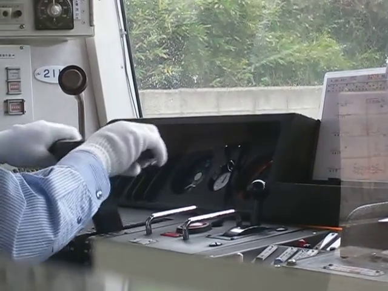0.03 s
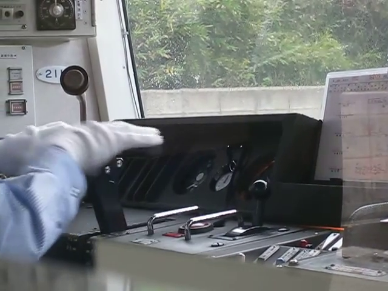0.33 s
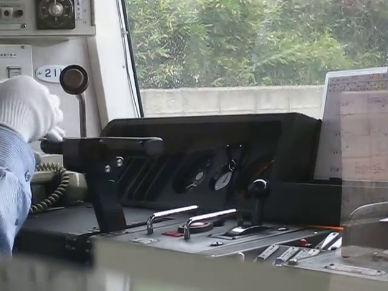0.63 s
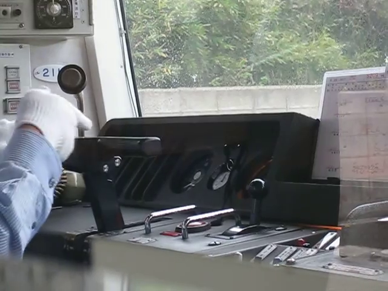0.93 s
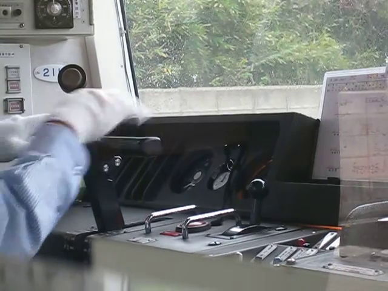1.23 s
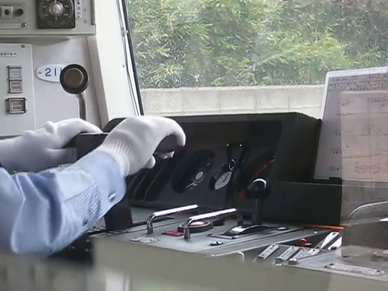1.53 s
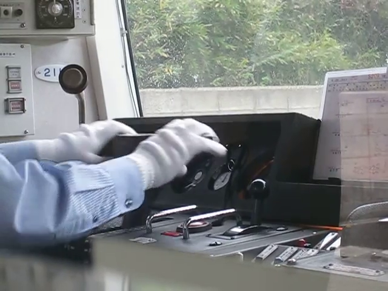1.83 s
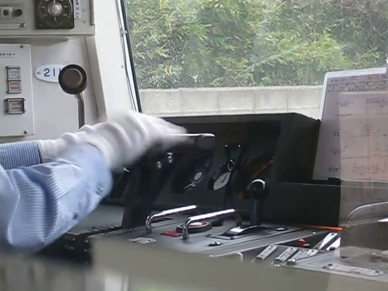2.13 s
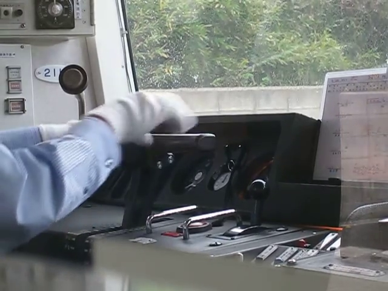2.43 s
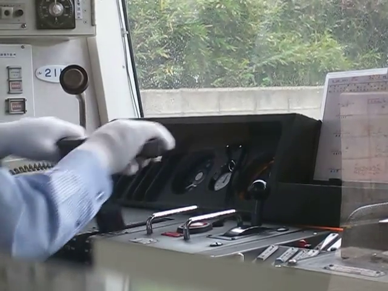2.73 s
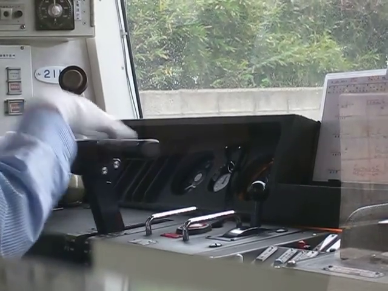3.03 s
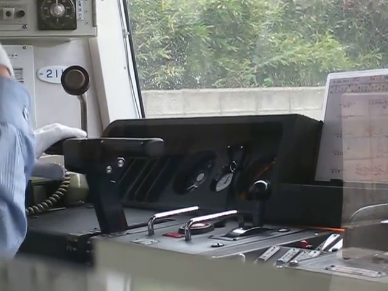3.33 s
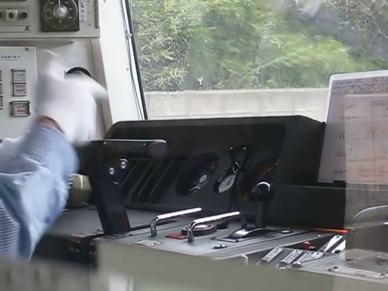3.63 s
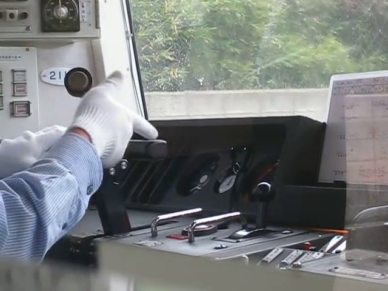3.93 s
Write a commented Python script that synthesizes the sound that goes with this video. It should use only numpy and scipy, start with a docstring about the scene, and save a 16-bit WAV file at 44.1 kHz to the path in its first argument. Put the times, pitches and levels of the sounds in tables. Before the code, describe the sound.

Compressed air hisses loudly twice from a train's brake valve inside the driver's cab.

```python
"""Inside a train driver's cab, one microphone, the walls close by. Over a low rumble, compressed air
vents from the brake valve with a puff and a long hiss. The jet rings the exhaust pipe's narrow resonances,
hoots briefly, and single bands swell as the flow shifts. Near 1.5 s it ends in short, duller puffs.
The rumble shows in the gap, with a tick and a faint whistle. More puffs lead into a second hiss from
2.7 s to the end. Gain control ducks the rumble under both hisses."""
import sys
import numpy as np
from scipy import signal
from scipy.fft import rfft, irfft
from scipy.io import wavfile
from scipy.ndimage import uniform_filter1d

SR = 44100
rng = np.random.default_rng(int(sys.argv[2]) if len(sys.argv) > 2 else 0)


def log_audio(samples):
    """Write samples as a 16-bit WAV file to the path given in sys.argv[1]."""
    # one column per channel
    frames = np.atleast_2d(samples).T
    # limit to full scale, then quantise
    limited = np.clip(frames, -1, 1)
    pcm = np.round(limited * 32767).astype(np.int16)
    wavfile.write(sys.argv[1], SR, pcm)


N = 176400
TIME, FREQ = np.arange(N) / SR, np.fft.rfftfreq(N, 1 / SR)

# spectrum of the cab's rumble: (frequency [Hz], relative level [dB])
RUMBLE_SPECTRUM = [(12, -34), (20, -9.5), (90, -14), (157, -13), (372, -4), (453, -11), (535, -1),
                   (650, -9), (883, -11), (1300, -16.5), (1800, -17.5), (2500, -24.5), (3760, -32),
                   (6210, -33), (7540, -40), (8200, -46), (9420, -33), (10500, -39.5), (11800, -32.5),
                   (15600, -49)]
# short puffs of air: (start [s], hold [s], level [dB], treble lift [dB])
PUFF_EVENTS = [(-.005, 0.042, -27.5, -20), (1.403, 0.089, -29, 0), (1.624, 0.014, -38, 2),
               (1.715, 0.06, -32.5, -5), (1.782, 0.03, -26, -12), (1.838, 0.033, -25, -4.5),
               (2.549, 0.027, -34, 7), (2.621, 0.046, -28.5, -8), (2.654, 0.097, -25.5, -3.5),
               (2.728, 0.016, -20.5, 1), (2.792, 0.093, -28, 1)]
# spectrum of a puff: (frequency [Hz], relative level [dB])
PUFF_SPECTRUM = [(15, -48), (25, -26), (129, -5.5), (169, -17), (282, -3), (400, -6), (496, -5),
                 (632, -1.5), (704, -10.5), (1110, -1.5), (1420, -8), (1880, -1.5), (2430, -12),
                 (3350, -8.5), (5300, -15), (6070, -12.5), (7130, -18.5), (7940, -28.5), (11000, -17.5),
                 (14000, -24), (15600, -38)]
# resonances of the exhaust pipe: (frequency [Hz], width [Hz], lift [dB])
PIPE_RESONANCES = [(325, 58, 9.5), (673, 69, 5), (982, 32, 13), (1041, 42, 10), (1105, 13.3, 16),
                   (1219, 114, 6), (1486.5, 47, 10), (1553, 75, 10), (1687.4, 81, 15.5), (1767.5, 40, 15.5),
                   (1889, 41, 13), (1992, 85, 4.5), (2154, 46, 9), (3000, 220, 5), (3872, 79, 12.5),
                   (4164, 134, 9), (4322, 52, 15.5), (6325, 92, 9), (6430, 17, 12.5), (6540, 75, 13),
                   (12470, 74, -3), (12540, 64, 1), (14390, 80, 5)]
# spectrum of the air jet: (frequency [Hz], relative level [dB])
JET_SPECTRUM = [(100, -20.5), (250, -23), (500, -8.5), (900, -2), (1700, -1), (2320, -0.5), (2440, -15),
                (3400, -10.5), (4400, -6), (4800, -12), (5600, -1.4), (6550, -11), (6750, -17), (7400, -15),
                (7900, -31.5), (8500, -13.5), (9500, -9), (12300, -1.5), (14500, -11), (15600, -20.2)]
# limits of the jet's four bands: (frequency [Hz])
JET_BAND_EDGES = [0, 900, 2450, 7900, 20000]
# relative band levels, one table per venting: (time [s], bass [dB], body [dB], upper mids [dB], treble [dB])
VENT_LEVELS = [
    [(0, -45, -32, -38, -37), (.028, -30, -42, -42, -40), (.038, -35.5, -24, -30.5, -21),
     (.13, -37.5, -24.5, -33, -27), (.45, -31.5, -19.5, -31, -28.5), (.73, -34.5, -24, -29.5, -27.5),
     (1.03, -33, -20.5, -30, -27.5), (1.28, -35, -26.5, -31, -27.5), (1.456, -36, -28.5, -34, -30),
     (1.52, -40, -32.5, -37, -32), (1.592, -67, -39, -46.5, -49.5), (1.7, -69, -55, -76, -69)],
    [(2.69, -62, -47, -55, -64), (2.728, -55, -42, -46, -41), (2.742, -35, -23, -30, -26.5),
     (2.775, -37, -27, -32, -26), (2.825, -43, -33, -41, -31), (2.868, -34, -17.5, -27.5, -26),
     (2.93, -41, -24, -27, -27.5), (3.09, -47, -26.5, -32, -27.5), (3.2, -39, -25, -31, -27),
     (3.7, -36, -22, -29.5, -29), (4.0, -32.5, -22.5, -30, -26.5)],
]
# narrow rushes of air:
# (middle [s], half length [s], frequency [Hz], glide [Hz/s], width [Hz], relative level [dB])
FLOW_SWELLS = [(0.2, 0.22, 3590, 153.5, 160, -33), (0.273, 0.45, 2700, 4, 330, -41),
               (0.195, 0.074, 1320, 0, 110, -27.5), (0.254, 0.38, 4950, -300, 430, -35),
               (0.302, 0.77, 7130, 447, 480, -41.5), (0.403, 0.14, 1275, -200, 90, -22.5),
               (0.557, 0.19, 1330, 502, 119, -27.5), (0.68, 0.71, 4000, 798.5, 520, -34.5),
               (1.1, 0.37, 4440, -8, 280, -36), (0.79, 0.084, 1472, 0, 50, -26),
               (0.87, 0.16, 687, 0, 49.6, -29), (1.109, 0.35, 1696, 551.5, 173, -25),
               (1.22, 0.42, 10060, 6, 90, -40), (1.27, 0.31, 10780, -3, 260, -40.5),
               (1.36, 0.075, 1686, 0, 50, -25.5), (2.378, 0.022, 5400, -9000, 170, -63),
               (2.758, 0.13, 157, 4, 150, -44.5), (2.853, 0.076, 982, 0, 50, -33.5),
               (2.938, .11, 12800, 0, 2300, -27), (3.06, 0.19, 5520, -700, 380, -29),
               (3.21, 0.21, 2157, 3, 29.6, -36), (3.288, 0.12, 5470, -700, 380, -30.5),
               (3.429, 0.28, 4000, 509, 400, -31), (3.45, 0.08, 1470, 0, 90, -25),
               (3.48, 0.21, 7170, 12, 400, -39), (3.696, 0.17, 682, 0, 80, -32),
               (3.762, 0.07, 1494, 0, 50, -22.5), (3.862, 0.15, 4360, 400, 250, -31.5),
               (3.919, 0.078, 385, 0, 69.5, -34.5), (3.92, 0.14, 1750, 150, 120, -22.5)]
# hoots of the jet: (start [s], length [s], pitch [Hz], level [dB])
HOOT_EVENTS = [(0.357, 0.025, 1262, -10.5), (0.394, 0.056, 1257, -17.5)]
# course of the thin whistle: (time [s], pitch [Hz], level [dB])
WHISTLE_PATH = [(1.9, 7370, -72), (2.15, 7500, -57), (2.3, 7500, -66), (2.55, 7350, -75)]


def amp(db):
    """Decibels to gain."""
    return 10 ** (np.asarray(db) / 20)


def unit(x):
    """Scales to rms 1."""
    return x / np.sqrt(np.mean(x ** 2) + 1e-20)


def spectrum(points):
    """A spectrum table as gain along the frequency axis."""
    hz, db = np.transpose(points)
    return amp(np.interp(np.log(FREQ + 1), np.log(hz + 1), db))


def bell(axis, middle, width):
    """A bump of height 1 with the given width at half height."""
    return .5 ** ((2 * (axis - middle) / width) ** 2)


def noise(gain):
    """Noise of rms 1 with the given spectrum."""
    return unit(irfft(rfft(rng.standard_normal(N)) * gain, N))


def wander(rate_hz):
    """Random drift of rms 1, mostly slower than the given rate."""
    return noise(bell(FREQ, 0, 2 * rate_hz))


def wall_colour(ripple_db=4.5, ripple_hz=18, from_hz=2700, to_hz=19000):
    """Reflections from the close walls comb the treble into fine peaks and dips."""
    size = int(ripple_hz * N / SR)
    comb = unit(uniform_filter1d(uniform_filter1d(rng.standard_normal(len(FREQ)), size), size))
    treble = FREQ ** 2 / (FREQ ** 2 + from_hz ** 2) / (1 + (FREQ / to_hz) ** 2)
    return amp(ripple_db * comb * treble)


def cab_rumble(walls, level_db=-38.5, unsteady_db=1.4):
    """Room tone of the cab: a low rumble whose level wavers slightly."""
    return amp(level_db + unsteady_db * wander(7.9)) * noise(walls * spectrum(RUMBLE_SPECTRUM))


def air_puffs(walls, rise_s=.0095, t60_s=.29, lift_hz=2500, low_cut_hz=56):
    """Broad bursts of air open fast, hold and die away in the cab."""
    low_cut = FREQ ** 4 / (FREQ ** 4 + low_cut_hz ** 4)
    treble = FREQ ** 2 / (FREQ ** 2 + lift_hz ** 2)
    shape = walls * spectrum(PUFF_SPECTRUM) * low_cut
    out = np.zeros(N)
    for start, hold, db, lift_db in PUFF_EVENTS:
        t = TIME - start
        envelope = np.clip(t / rise_s, 0, 1) * amp(db - 60 * np.maximum(t - hold, 0) / t60_s)
        out += envelope * noise(shape * amp(lift_db * treble))
    return out


def valve_hiss(walls, gain_db=4.5, flutter_db=.67, sputter_db=.25):
    """The brake valve's fluttering jet rings the exhaust pipe; four bands follow their own levels."""
    pipe = walls * amp(sum(db * bell(FREQ, hz, width) for hz, width, db in PIPE_RESONANCES))
    jet = pipe * spectrum(JET_SPECTRUM)
    bands = [noise(jet * (FREQ >= lo) * (FREQ < hi)) for lo, hi in zip(JET_BAND_EDGES, JET_BAND_EDGES[1:])]
    hiss = np.zeros(N)
    for vent in VENT_LEVELS:
        times, *levels = np.transpose(vent)
        is_open = (TIME > times[0] - .05) * (TIME < times[-1] + .05)
        for band, db in zip(bands, levels):
            hiss += band * amp(np.interp(TIME, times, db)) * is_open
    hiss += flow_swells(pipe)
    return hiss * amp(gain_db + flutter_db * wander(rate_hz=25) + sputter_db * wander(rate_hz=249))


def flow_swells(pipe):
    """As the flow shifts, narrow rushes of air swell, glide and fade, coloured by the pipe."""
    out = np.zeros(N)
    for middle, half_length, hz, glide, width, db in FLOW_SWELLS:
        t = TIME - middle
        envelope = np.cos(np.pi / 2 * np.clip(t / half_length, -1, 1))
        # complex noise, so that a turning phase slides the whole band
        eddies = np.fft.ifft(rfft(rng.standard_normal(N)) * np.sqrt(bell(FREQ, hz, width)), N)
        slide = np.exp(1j * np.pi * glide * t ** 2)
        rush = envelope * (eddies * slide).real
        piped = unit(irfft(rfft(rush) * np.sqrt(pipe), N))
        out += amp(db) * np.sqrt(np.mean(envelope ** 2)) * piped
    return out


def jet_hoots(edge_s=.006, waver_rad=.5, waver_hz=45):
    """For an instant the jet locks onto one unsteady note."""
    out = np.zeros(N)
    for start, length, hz, db in HOOT_EVENTS:
        t = TIME - start
        envelope = amp(db) * np.clip(np.minimum(t, length - t) / edge_s, 0, 1)
        out += envelope * unit(np.sin(2 * np.pi * hz * t + waver_rad * wander(waver_hz)))
    return out


def control_tick(start_s=2.071, hz=4100, width_hz=1200, level_db=-47, t60_s=.04):
    """A tiny, dry tick from the controls."""
    t = TIME - start_s
    envelope = (t > 0) * amp(level_db - 60 * np.maximum(t, 0) / t60_s)
    return envelope * noise(bell(FREQ, hz, width_hz))


def air_whistle(waver_hz=60):
    """A thin, wavering whistle of air rises just clear of the room tone between the hisses."""
    times, hz, db = np.transpose(WHISTLE_PATH)
    turns = np.cumsum(np.interp(TIME, times, hz)) / SR
    return np.sin(2 * np.pi * turns + wander(waver_hz)) * amp(np.interp(TIME, times, db))


def scene():
    """The cab as it reaches the microphone, the same in both channels."""
    walls = wall_colour()
    mix = cab_rumble(walls) + air_puffs(walls) + valve_hiss(walls)
    mix += jet_hoots() + control_tick() + air_whistle()
    return np.array([mix, mix])


def record(dry, knee_db=-35, squeeze=.35, recover_db_per_s=47, makeup_db=1, top_hz=15750):
    """Gain control turns the loud air down; then come the microphone's notch and the band limit."""
    power_db = 10 * np.log10(abs(uniform_filter1d(dry[0] ** 2, size=1500)) + 1e-12)
    recovery_db = TIME * recover_db_per_s
    held_db = np.maximum.accumulate(power_db + recovery_db) - recovery_db  # grabs peaks, lets go slowly
    over_db = uniform_filter1d(np.maximum(held_db - knee_db, 0), size=800)
    ducked = dry * amp(makeup_db - squeeze * over_db)
    microphone_notch = amp(-8 * bell(FREQ, middle=7970, width=250))
    heard = irfft(rfft(ducked) * microphone_notch, N)
    low_pass = signal.firwin(611, top_hz, window=("kaiser", 9), fs=SR)
    return signal.oaconvolve(heard, low_pass[None], "same")


dry = scene()
out = record(dry)
log_audio(out)
```